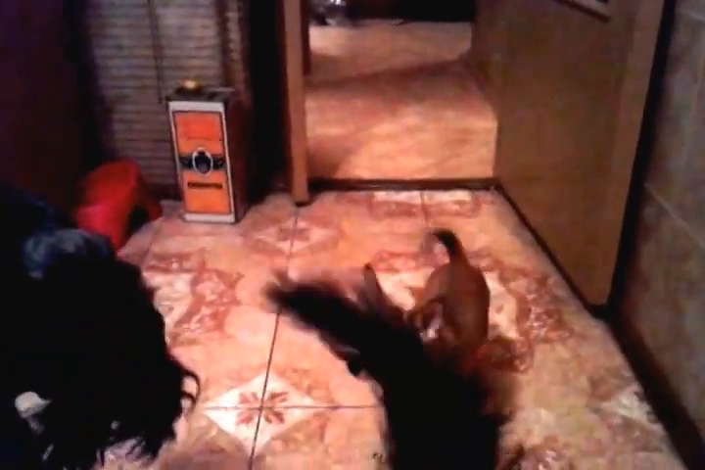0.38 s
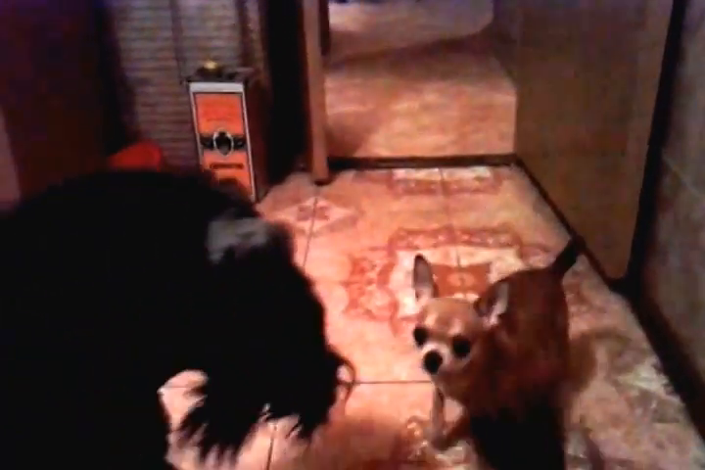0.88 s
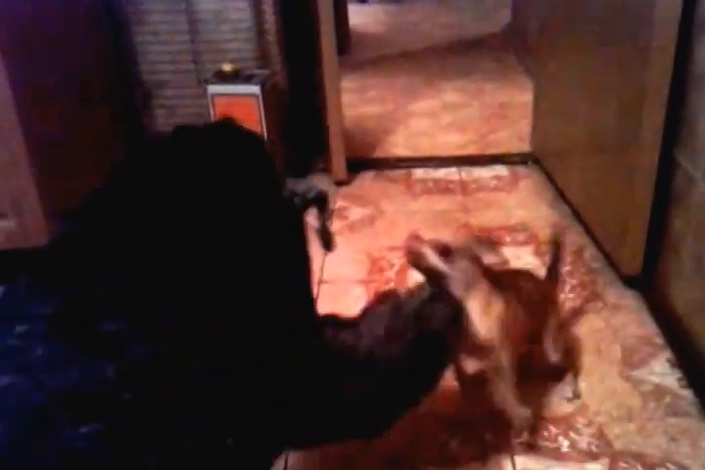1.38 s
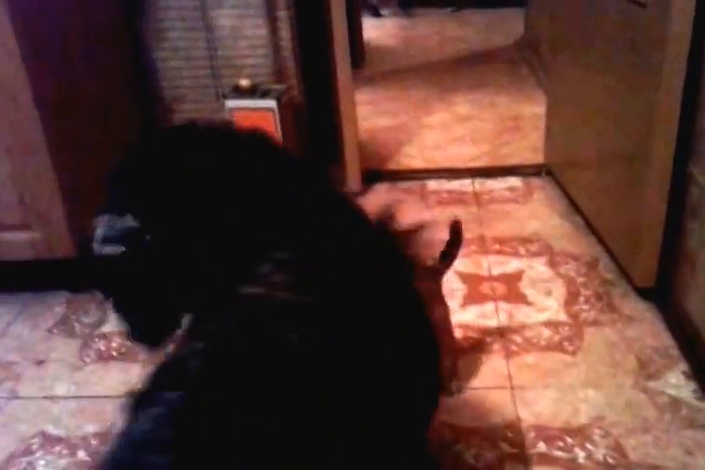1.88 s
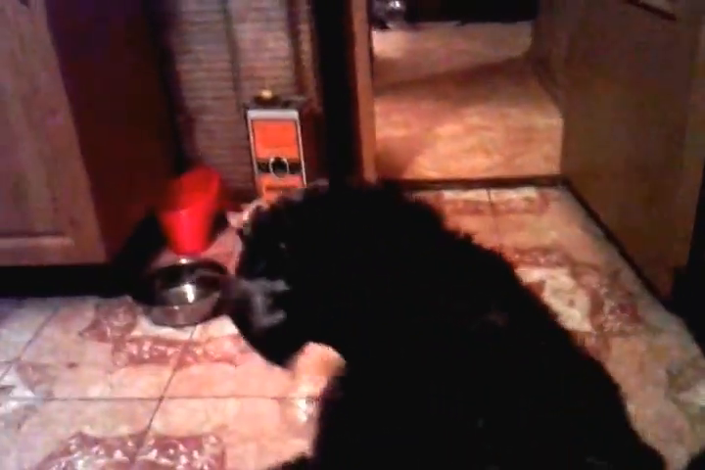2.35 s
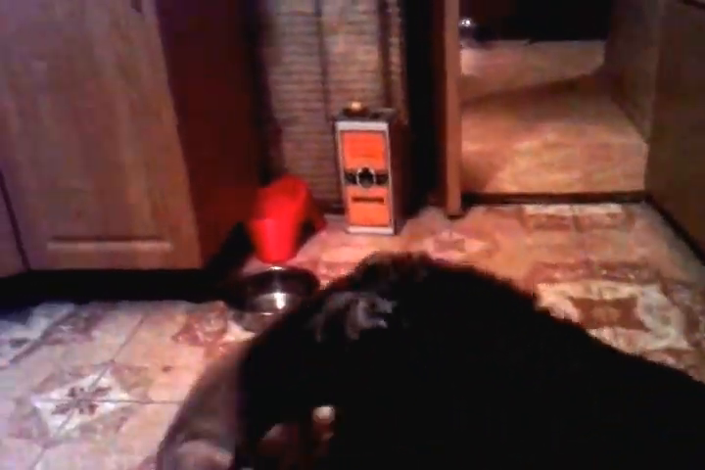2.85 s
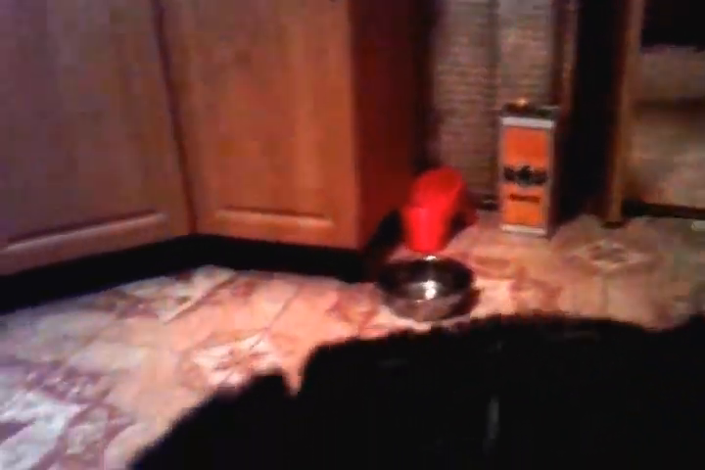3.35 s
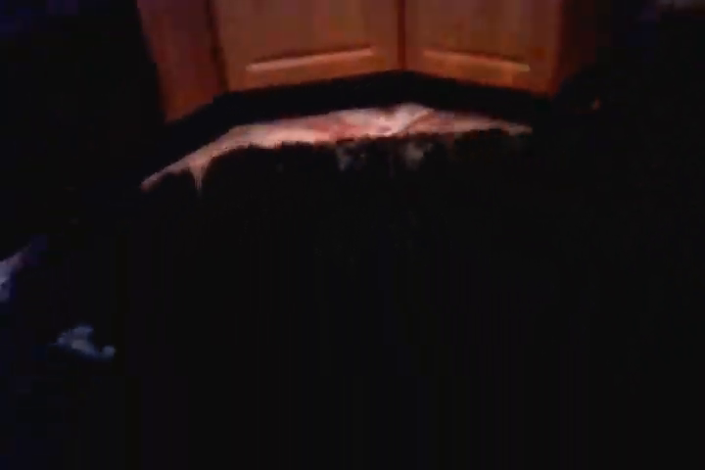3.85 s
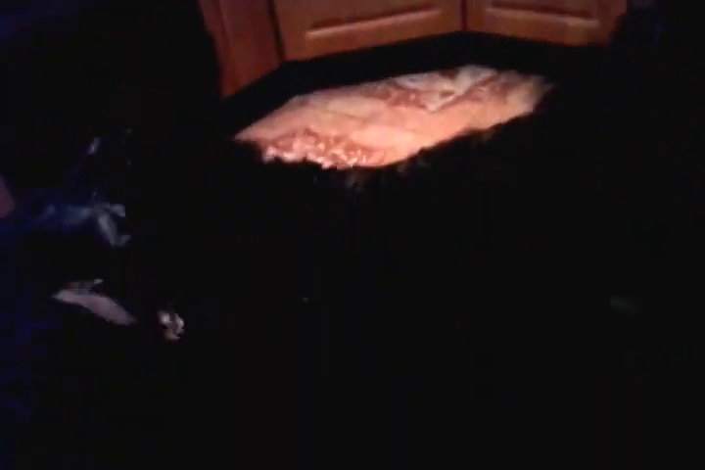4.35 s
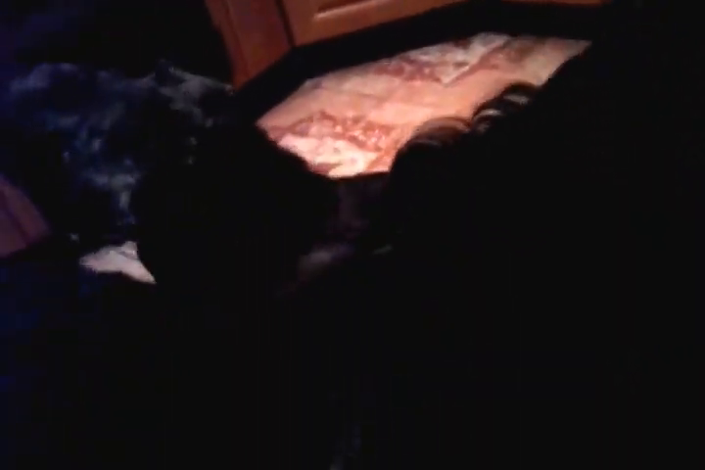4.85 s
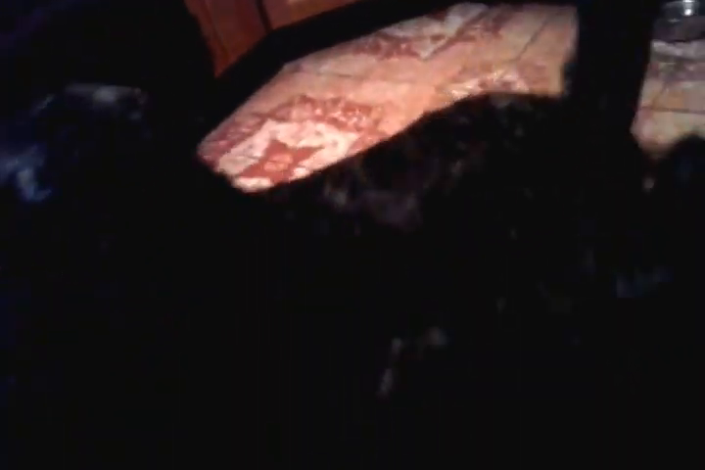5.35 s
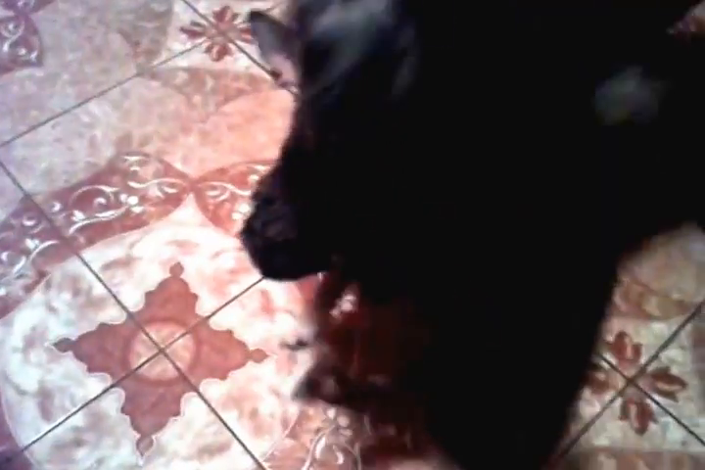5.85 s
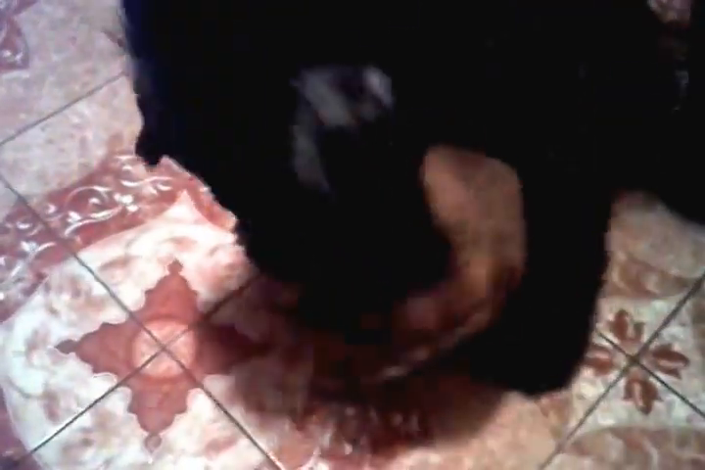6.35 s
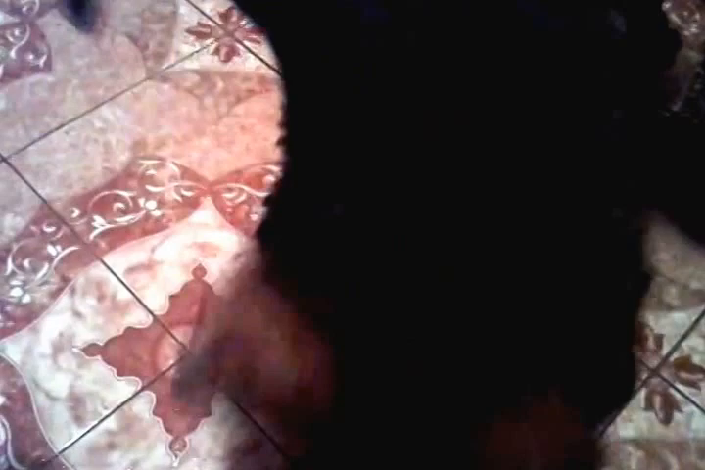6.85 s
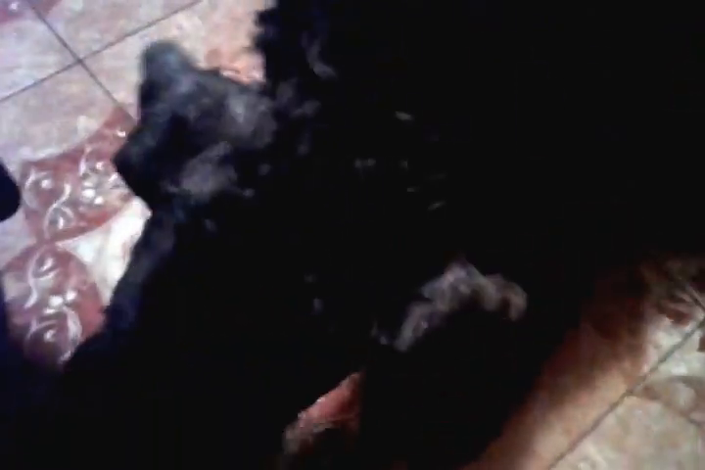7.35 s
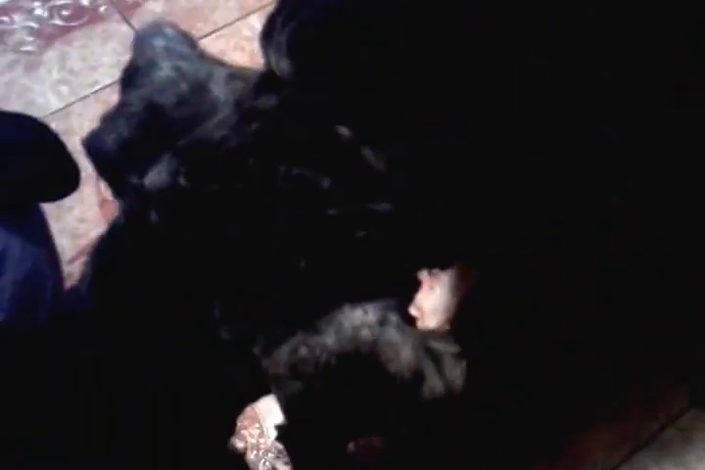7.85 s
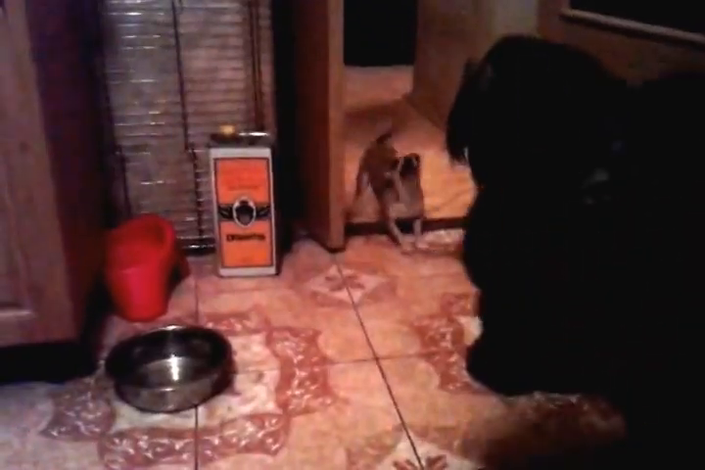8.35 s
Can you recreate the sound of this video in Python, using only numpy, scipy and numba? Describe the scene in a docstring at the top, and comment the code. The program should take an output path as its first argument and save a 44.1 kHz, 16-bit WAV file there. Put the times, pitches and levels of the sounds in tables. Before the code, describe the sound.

A big shaggy dog and a tiny one wrestle on kitchen tiles close to a small, cheap microphone. Bright claw ticks and airy fur scuffs come first, with paw knocks, a faint grunt and a short whine midway. Then heavy low bumps and handling-like thuds take over, muffled, before two loud hoarse yelps overload the microphone and ring in the hard room.

```python
"""Fur and pads scuff, claws tick, bodies bump, a collar tag tinkles, and there are grunts and a whine, as a big
shaggy dog and a tiny one wrestle on kitchen tiles by a small camera, over a fridge hum and a thin tone.
At the end the tiny dog yelps twice from the doorway; the hard room rings and the microphone overloads.
Rubbing is shaped noise, blows and the tag are fading rings, and voices are stacks of wavering harmonics."""
import sys
import numpy as np
from scipy import signal
from scipy.fft import rfft, irfft, next_fast_len
from scipy.io import wavfile
from scipy.ndimage import uniform_filter1d
from numba import njit

SR = 44100
rng = np.random.default_rng(int(sys.argv[2]) if len(sys.argv) > 2 else 0)


def gain_from_db(level_db):
    """Convert decibel levels to linear amplitude factors (20 dB per decade)."""
    decades = np.asarray(level_db, float) / 20
    return 10 ** decades


def store_wav(level_fs):
    """Save 16-bit WAV to argv[1]."""
    pcm = np.round(np.clip(np.atleast_2d(level_fs), -1, 1) * 32767)
    wavfile.write(sys.argv[1], SR, pcm.T.astype(np.int16))


N = 384552
T = np.arange(N) / SR  # time of every sample in seconds

# All levels below are those before the room, the gain control and the overload.
# Hum of the fridge. Each row: pitch in Hz, level in dB around which it wavers.
HUM = [(98, -68), (275, -74), (700, -76)]
# Colour of the air and microphone hiss. Each row: frequency in Hz, relative level in dB.
HISS_COLOUR = [(30, -23), (80, -18.5), (150, -16), (260, -29), (520, 8), (900, -6), (3000, -40),
               (6000, -18), (8000, -15), (11000, -6), (16000, -30)]
HISS_DB = -72  # level before its slow flicker

# Colours of fur swishing, pads sliding and bodies rubbing. Each row: frequency in Hz, relative level in dB.
SWISH_COLOUR = [(2060, -52), (3500, -19.5), (5900, -11.5), (6490, -8.5), (7230, -1.5), (7750, 2.5),
                (9740, -12), (11300, -15), (15100, -25.5), (16000, -36.5)]
SLIDE_COLOUR = [(500, -3), (1000, 3.5), (2000, 6), (3500, 2.5), (6000, -3), (12000, -18.5)]
RUB_COLOUR = [(30, -46.5), (70, -1), (110, 7), (175, -2), (280, 5.5), (600, -4.5), (1300, -13),
              (3000, -36.5)]
# Restless shifting between the scuffs. Each row: time in seconds, fur swish, pad slide and body rub in dB.
SHIFTING = [(0, -50, -82, -64.5), (.4, -58, -63, -64), (.64, -49.5, -60, -64.5), (1.0, -51.5, -63.5, -65),
            (1.33, -67, -70, -71.5), (1.56, -61, -70.5, -70), (1.85, -51, -62.5, -70),
            (2.9, -54, -65, -67.5), (3.6, -48, -61.5, -62), (3.85, -56, -62, -72), (4.33, -55, -64, -61.5),
            (4.9, -46, -59.5, -60), (5.18, -61, -60.5, -62.5), (5.52, -65, -62, -73),
            (5.7, -52.5, -59, -59), (6.0, -66, -59, -41.5), (6.15, -89, -80, -52), (6.3, -95.5, -73, -59.5),
            (7.37, -87, -75, -60), (7.97, -98, -63, -48.5), (8.001, -53, -54.5, -48),
            (8.08, -47, -49.5, -49), (8.72, -48.5, -47.5, -46.5)]
# Fur and pads scuffing the tiles. Each row: peak time, rise and fall in seconds, fur swish and pad slide in dB.
SCUFFS = [(0.01, 0.13, 0.4, -41, -53), (.2, 0.026, 0.049, -42.5, -73), (.324, 0.022, 0.048, -45.5, -68),
          (.402, 0.083, 0.067, -50, -69), (.49, 0.093, .035, -47, -64), (.586, .06, .05, -53, -70),
          (1.055, 0.14, 0.06, -49, -52), (1.13, 0.18, 0.083, -44.5, -60), (1.23, 0.14, 0.17, -52.5, -72),
          (1.395, 0.048, 0.15, -35, -58), (1.62, 0.036, 0.06, -41.5, -62),
          (1.685, 0.046, 0.14, -35.5, -51.5), (1.79, 0.038, 0.25, -41.5, -62),
          (1.96, 0.026, 0.094, -39.5, -64), (2.075, 0.14, 0.23, -35.5, -47), (2.33, 0.16, 0.15, -43.5, -41),
          (2.48, 0.22, 0.24, -40.5, -63), (2.63, 0.12, 0.3, -32, -46), (2.81, 0.02, 0.12, -38.5, -70),
          (2.85, .02, 0.13, -39, -64), (2.94, 0.019, 0.13, -40.5, -63), (3.04, 0.12, 0.19, -42, -72),
          (3.15, 0.4, 0.25, -35.5, -51), (3.316, 0.19, 0.15, -32.5, -46.5),
          (3.425, 0.053, 0.16, -40.5, -54.5), (3.53, 0.31, 0.19, -41, -58), (3.746, 0.1, 0.17, -43.5, -60),
          (4.04, .02, 0.09, -42.5, -57), (4.19, 0.15, 0.15, -38.5, -54.5),
          (4.355, 0.026, 0.044, -40.5, -61), (4.405, 0.012, 0.25, -41.5, -69),
          (4.53, .015, 0.062, -42.5, -61), (4.655, 0.12, 0.24, -28.5, -40.5),
          (4.84, 0.19, 0.19, -45.5, -52), (4.895, 0.022, 0.16, -43.5, -66), (4.995, 0.021, 0.087, -43, -55),
          (5.08, 0.065, 0.073, -39.5, -53), (5.228, 0.044, 0.19, -34, -49.5),
          (5.285, 0.095, 0.24, -26.5, -42), (5.43, 0.6, 0.052, -48, -48.5), (5.56, 0.034, 0.33, -54.5, -69),
          (5.7, 0.019, 0.065, -42, -58.5), (5.752, 0.1, 0.16, -47, -54.5), (5.94, 0.41, 0.045, -67, -51.5),
          (6.12, .03, 0.013, -73, -54), (6.45, 0.45, 0.52, -70.5, -70), (6.68, 0.018, 0.29, -79, -64.5),
          (7.07, 0.045, 0.56, -74, -74.5), (7.385, 0.019, 0.033, -59, -61), (7.43, 0.097, 0.05, -85, -53.5),
          (7.56, 0.031, 0.095, -76, -50), (7.69, 0.17, 0.19, -72, -35), (7.915, 0.07, 0.061, -70, -46.5)]
# Heavy bodies rubbing the floor. Each row: peak time, rise and fall in seconds, level in dB.
RUBS = [(.324, 0.055, .04, -57), (1.42, 0.06, 0.25, -64), (1.785, 0.12, 0.1, -49.5),
        (2.326, 0.43, 0.16, -57.5), (2.67, 0.12, 0.11, -59), (3.31, 0.43, 0.04, -53),
        (3.68, 0.25, 0.36, -53), (3.9, 0.057, 0.7, -49.5), (4.03, 0.042, 0.26, -51), (4.64, 0.1, 0.18, -57),
        (5.302, 0.071, 0.31, -49.5), (5.436, 0.015, 0.15, -55), (5.56, 0.044, 0.53, -46.5),
        (5.755, 0.082, 0.51, -43), (6.145, 0.075, 0.0074, -32.5), (6.17, 0.04, 0.21, -42.5),
        (6.37, .02, 0.62, -47), (6.488, 0.22, 0.2, -42), (6.718, 0.11, 0.14, -46.5),
        (7.07, 0.025, 0.74, -54.5), (7.39, 0.011, 0.21, -37), (7.574, 0.041, 0.0079, -28),
        (7.7, 0.89, 0.34, -39.5)]
STROKE_DROP_DB, STROKE_ROUND = 31.5, 1.323  # fall over one rise or fall time; roundness of the top
SLIDE_LAG_S = 0.012  # the pads slip a little after the fur
STRAY_TICKS_PER_S, STRAY_TICK_DB = 6, 1  # faint ticks; their strength over the fur swish, before colouring

# Paws and elbows knocking the tiles. Each row: start in seconds, level in dB, ring in Hz.
KNOCKS = [(0.095, -41, 880), (0.319, -48, 676), (0.577, -48.5, 717), (1.052, -40, 826),
          (1.425, -54.5, 1080), (1.719, -42, 920), (1.769, -39.5, 835), (1.79, -38, 1006),
          (3.421, -48, 1170), (3.901, -41.5, 782), (4.179, -40.5, 966), (4.892, -45, 570),
          (5.724, -39, 697), (5.753, -38.5, 1235), (5.864, -35.5, 740), (6.004, -35, 595),
          (6.355, -41, 658), (6.478, -38.5, 575), (6.677, -47, 1890), (6.722, -53, 570), (7.442, -34, 620),
          (7.799, -38.5, 880), (7.445, -38, 1520)]
# Claw ticks. Each row: start in seconds, level in dB, dull part relative to that in dB.
CLAWS = [(0.191, -35, -37), (0.2659, -24.5, -27), (0.321, -24.5, -21), (0.4003, -25, -22),
         (0.447, -27.5, -43), (0.493, -22, -42), (0.534, -24, -35), (0.5568, -27, -9), (0.582, -17, -49),
         (0.627, -21.5, -36), (0.6849, -23.5, -20), (0.746, -35.5, -17), (0.758, -30, -15),
         (0.832, -34, -30), (1.3807, -24, -26), (1.6772, -23.5, -24), (1.7848, -33, -23),
         (1.951, -35.5, -22), (2.305, -38.5, -17), (2.583, -22.5, -35), (2.803, -37, -27),
         (2.8446, -27.5, -19), (2.9342, -30.5, -30), (3.4136, -30, -23), (4.0313, -28.5, -39),
         (4.3488, -32.5, -21), (4.401, -27, -20), (4.525, -33, -17), (4.8384, -30, -16),
         (4.8904, -32.5, -1.5), (4.9937, -33.5, -11), (5.075, -36, -14), (5.2227, -23, -33),
         (5.4376, -21, -22), (5.695, -37.5, -31), (7.3944, -54, 18), (7.5704, -45, 13), (7.925, -54, -1.5),
         (7.9987, -36, -18)]
# Colour of a claw tick. Each row: frequency in Hz, relative level in dB.
TICK_COLOUR = [(3000, -39), (6000, -20), (7300, 1), (8000, 10.5), (9500, -11), (13000, -31), (16000, -36.5)]
# Blows on the collar tag. Each row: start in seconds, level in dB.
TAG_HITS = [(.482, -40), (4.798, -40.5), (4.837, -43), (5.433, -40.5), (5.788, -58), (5.859, -53.5),
            (8.63, -43.5)]
# Rings of the tag. Each row: pitch in Hz, relative level in dB, time to fade by 60 dB in seconds.
TAG_RINGS = [(10030, 7.5, 0.058), (11070, 0, 0.1), (11860, -6, 0.24), (15470, -11.5, .2)]
# Bodies bumping floor and camera. Each row: start in seconds, level in dB, ring in Hz.
BUMPS = [(1.42, -56, 210), (4.029, -48, 383), (6.72, -38, 270), (5.432, -30, 97.5), (6.003, -19, 242),
         (6.086, -17.5, 95), (6.149, -20.5, 118), (7.058, -35, 277), (7.146, -37.5, 250), (7.389, -25, 286),
         (7.416, -11, 81), (7.478, -25, 208), (7.564, -35, 205), (7.6235, -20, 350), (7.72, -32, 258),
         (7.797, -28, 240)]

# Grunts. Each row: start and length in seconds, first and last pitch in Hz, level in dB.
GRUNTS = [(3.56, 0.28, 81, 101.7, -50), (6.352, 0.293, 120.6, 147.3, -50.5)]
# Resonances of the big chest. Each row: centre in Hz, width in Hz, relative level in dB.
CHEST = [(150, 160, 7), (280, 110, -3), (620, 260, -4)]
# The whine. One row: start and length in seconds, first and last pitch in Hz, level in dB.
WHINE = (3.855, .285, 322, 474, -40)
# Snaps of the camera casing. Each row: start in seconds, peak in dB.
SNAPS = [(4.031, -22), (5.437, -19), (5.942, -23), (5.977, -27), (6.0226, -26), (6.1366, -20),
         (6.35, -34.5), (6.44, -32), (7.566, -30), (7.5705, -26), (7.571, -25), (7.62, -29), (7.8006, -23),
         (7.913, -28), (7.928, -36)]
# When the thin tone sounds. Each row: start and end in seconds, level in dB around which it wavers.
THIN_TONE = [(5.53, 6.0, -66), (7.78, 7.997, -65)]
THIN_TONE_HZ = 2400  # pitch around which it wavers

# Two yelps, each splitting into two pitches at once. Each row: start and length in seconds, first and top
# pitch in Hz, level in dB, fade in dB per second, pitch jitter as a share of the pitch once hoarse.
YELPS = [(8.103, 0.11, 1130, 1687, 1.5, 36, 0.026), (8.154, 0.075, 1835, 1849, 1, 20, 0.013),
         (8.321, 0.1303, 800, 979.5, 0.5, 30, 0.035), (8.344, 0.17, 1090, 1459, -1, 91, 0.042)]
YELP_GLIDE_S, YELP_SAG_HZ_PER_S, YELP_SWELL_DB = .059, 15, 3.5
# Tone colour of the first yelp's lower pitch. Each row: frequency in Hz, gain in dB.
FIRST_LOWER_TONE = [(500, -16), (1000, 13), (1300, -11.5), (1800, 9), (2300, -1), (2700, 3.5), (3500, -0.5),
                    (4400, -4), (5200, -7.5), (8000, -8.5), (12000, -31)]
# Tone colour of the first yelp's upper pitch and of the second yelp. Each row: frequency in Hz, gain in dB.
OTHER_YELP_TONE = [(500, -20), (850, -3.5), (1000, -16), (1450, 1), (1950, 4), (2300, 5), (2650, 2.5),
                   (2950, 3), (3900, -8), (4600, -16.5), (5800, -11), (8000, -18), (12000, -41)]
# Hoarse air in a yelp. Each row: frequency in Hz, relative level in dB.
RASP_COLOUR = [(900, -21), (1300, -4), (1800, 3.5), (3000, 5.5), (4400, -2), (8000, -6.5), (12000, -21.5)]
# Low thumps of the overloaded microphone input at the height of each yelp.
# Each row: peak time, rise and fall in seconds, level in dB.
THUMPS = [(8.172, 0.052, 0.0085, -9.5), (8.205, 0.046, .015, -21), (8.383, 0.015, 0.013, -16),
          (8.408, 0.014, 0.032, -18)]
# Colour of those thumps. Each row: frequency in Hz, relative level in dB.
THUMP_COLOUR = [(50, -10), (120, 0), (350, 0), (800, -9), (1300, -30)]

ROOM_T60_S, ROOM_DAMP = 0.35, 0.32  # time to fade by 60 dB before damping; treble lost on every round
QUIET_DB, LOUD_DB = -33, -21  # the gain control acts below the first and above the second
TOP_HZ = 16000  # upper edge of the input stage


def coloured(points, x):
    """Shape the spectrum of x by points of Hz and dB, then bring its rms to 1."""
    hz, db = np.transpose(points)
    size = next_fast_len(N)
    f = np.arange(size // 2 + 1) * SR / size + 1
    gain = gain_from_db(np.interp(np.log(f), np.log(hz), db))
    y = irfft(rfft(x, size) * gain, size)[:N]
    return y / np.sqrt(np.mean(y ** 2))


def ring(x, hz, t60):
    """One fading resonance, struck by x; an impulse of 1 rings with peak 1."""
    r = np.exp(-np.log(1000) / (max(t60, .001) * SR))
    w = 2 * np.pi * hz / SR
    return signal.lfilter([0, r * np.sin(w)], [1, -2 * r * np.cos(w), r * r], x)


def walk(rate):
    """Random levels, rate of them per second, joined smoothly; spread near 1."""
    k = int(SR / rate)
    steps = np.repeat(rng.standard_normal(N // k + 1), k)
    return 1.37 * uniform_filter1d(uniform_filter1d(steps, k), k)[:N]


def add(out, s, x):
    """Mix x into out from time s."""
    i = int(s * SR)
    out[i:i + len(x)] += x[:N - i]


def friction(colour, db, grain_db, flicker_db, flicker_hz):
    """Countless tiny slips, a few much bigger than the rest, in uneven waves."""
    sizes = gain_from_db(grain_db * np.minimum(rng.exponential(size=N), 7))
    slips = rng.standard_normal(N) * sizes
    return coloured(colour, slips) * gain_from_db(db + flicker_db * walk(flicker_hz))


def strokes(table, column, between_db, lag_s=0):
    """Level in dB of strokes that swell to a peak and die away, over the shifting between them."""
    t = T[::64] - lag_s
    power = gain_from_db(2 * between_db[::64])
    for row in table:
        away = np.abs(t - row[0]) / np.where(t < row[0], row[1], row[2])
        power = power + gain_from_db(2 * (row[column] - STROKE_DROP_DB * away ** STROKE_ROUND))
    return np.interp(T, T[::64], 10 * np.log10(power))


def blows(table, t60, cycles, rattle_db):
    """A soft push sets a dull ring going and leaves a short rattle around it."""
    out, t = np.zeros(N), T[:SR // 4]
    noises = rng.standard_normal((len(table), len(t)))
    for (s, db, hz), noise in zip(table, noises):
        swell = 1 - np.exp(-t * hz / 0.5)
        rattle = ring(noise, 1.017 * hz, 6.5 / hz)
        body = np.sin(2 * np.pi * hz * t) + gain_from_db(rattle_db) * rattle / np.std(rattle)
        fade = gain_from_db(-60 * t / min(t60, cycles / hz))
        add(out, s, gain_from_db(db) * swell * body * fade)
    return out


def call(row, glide_s, attack_s, release_s, fade_db_per_s, sag_hz_per_s=0, swell_db=0):
    """Attack, swell through the glide, fade and sag, release: rows of seconds, Hz and dB."""
    start, length, first_hz, last_hz, db = row
    glide_s = min(glide_s, length - release_s)
    t = np.array([0, attack_s, glide_s, length - release_s, length])
    late = np.maximum(t - glide_s, 0)
    hz = first_hz + (last_hz - first_hz) * np.minimum(t / glide_s, 1) - sag_hz_per_s * late
    below_db = np.array([30, swell_db, 0, 0, 45])
    return np.transpose([start + t, hz, db - fade_db_per_s * late - below_db])


def played(rows):
    """Pitch and gain of a call at every sample, practically silent outside it."""
    s, hz, db = np.transpose(rows)
    return np.interp(T, s, hz), gain_from_db(np.interp(T, s, db, left=-200, right=-200))


def voice(rows, tract, air, count, jitter, shimmer_db, breath_db):
    """Harmonics of wavering vocal folds, shaped by the tract, each flickering; clear at first, then hoarse."""
    hz, gain = played(rows)
    hoarse = np.clip((T - rows[0][0]) / .05, .25, 1)
    hz = hz * (1 + hoarse * jitter * walk(300))
    on = gain > 1e-6
    turn = 2 * np.pi * np.cumsum(hz[on]) / SR
    f, db = np.transpose(tract)
    out = np.zeros(N)
    for k in range(1, count + 1):
        tract_db = np.interp(np.log(k * hz[on]), np.log(f), db)
        flicker_db = (hoarse * shimmer_db * walk(150))[on]
        out[on] += gain_from_db(tract_db + flicker_db) * np.sin(k * turn)
    breath = gain_from_db(breath_db) * coloured(air, rng.standard_normal(N))
    return gain * (out + hoarse * breath) * gain_from_db(hoarse * shimmer_db * walk(120) / 2)


def kitchen():
    """Air and microphone hiss under a fridge hum whose tones waver in pitch and level."""
    hum = np.zeros(N)
    for hz, db in HUM:
        turn = 2 * np.pi * np.cumsum(hz * (1 + .012 * walk(40))) / SR
        hum += gain_from_db(db + 4.2 * walk(12)) * np.sin(turn)
    return hum + friction(HISS_COLOUR, HISS_DB, grain_db=0, flicker_db=0.56, flicker_hz=8.7)


def scuffle():
    """Fur swishes, pads slide, heavy bodies rub along the floor; stray claws tick while they move."""
    s, *columns = np.transpose(SHIFTING)
    swish_db, slide_db, rub_db = (np.interp(T, s, c) for c in columns)
    swish_db = strokes(SCUFFS, column=3, between_db=swish_db)
    slide_db = strokes(SCUFFS, column=4, between_db=slide_db, lag_s=SLIDE_LAG_S)
    rub_db = strokes(RUBS, column=3, between_db=rub_db)
    swish = friction(SWISH_COLOUR, swish_db, grain_db=2.5, flicker_db=1.18, flicker_hz=70)
    slide = friction(SLIDE_COLOUR, slide_db, grain_db=2.5, flicker_db=1.6, flicker_hz=60)
    rub = friction(RUB_COLOUR, rub_db, grain_db=2.2, flicker_db=1.6, flicker_hz=50)
    happens = rng.random(N) < STRAY_TICKS_PER_S / SR
    stray = happens * rng.standard_normal(N) * gain_from_db(swish_db + STRAY_TICK_DB)
    return swish + slide + rub + np.std(stray) * coloured(TICK_COLOUR, stray)


def knocks():
    """Paws and elbows strike the hard tiles, which ring for a moment."""
    return blows(KNOCKS, t60=0.083, cycles=82, rattle_db=-0.71)


def claws():
    """Each tick is a brief scrape on the glaze, with a bright part and a dull ring."""
    bright, dull, t = np.zeros(N), np.zeros(N), T[:SR // 50]
    scrapes = rng.standard_normal((len(CLAWS), len(t))) * np.exp(-t / 0.00077)
    scrapes = scrapes / np.abs(scrapes).max(axis=1, keepdims=True)
    # How hard each scrape would ring the glaze; dividing by it evens out chance differences.
    glaze = np.abs(ring(scrapes, 7900, .003)).max(axis=1)
    for (s, db, dull_db), scrape, rings in zip(CLAWS, scrapes, glaze / np.median(glaze)):
        add(bright, s, gain_from_db(db) * scrape / rings)
        add(dull, s, gain_from_db(db + dull_db) * scrape)
    bright = np.std(bright) * coloured(TICK_COLOUR, bright)
    return gain_from_db(5.5) * bright + gain_from_db(4.0) * ring(dull, 2250, 0.00087)


def tag():
    """A small metal tag: few, high, clean rings set off by each tap."""
    taps = np.zeros(N)
    for s, db in TAG_HITS:
        add(taps, s, gain_from_db([db]))
    top_db = max(db for _, db, _ in TAG_RINGS)
    return gain_from_db(6.5) * sum(gain_from_db(db - top_db) * ring(taps, hz, t60) for hz, db, t60 in TAG_RINGS)


def bumps():
    """Bodies bump the floor and the camera: low rings that die after a few cycles."""
    return blows(BUMPS, t60=0.055, cycles=8.9, rattle_db=-1.5)


def grunts():
    """Rough low voices whose harmonics are shaped by the resonances of the big chest."""
    f = np.geomspace(60, 1500, 40)
    chest = sum(gain_from_db(db) / np.hypot(1, 2 * (f - hz) / w) ** 2 for hz, w, db in CHEST)
    tract = np.transpose([f, 20 * np.log10(chest)])
    swelling = call(GRUNTS[0], glide_s=1, attack_s=0.14, release_s=0.13, fade_db_per_s=0)
    bursting = call(GRUNTS[1], glide_s=.07, attack_s=.008, release_s=.05, fade_db_per_s=10, sag_hz_per_s=240)
    return sum(voice(rows, tract, tract, count=9, jitter=.015, shimmer_db=2, breath_db=-20)
               for rows in (swelling, bursting))


def whine():
    """A closed-mouth whine, nearly a pure tone, as the nose lets only the low harmonics through."""
    nose = [(300, 4.5), (500, 0.0), (800, -23), (1500, -36)]  # Hz, dB
    rows = call(WHINE, glide_s=1, attack_s=0.06, release_s=0.051, fade_db_per_s=0, swell_db=-3.5)
    return voice(rows, nose, nose, count=3, jitter=0.011, shimmer_db=2.0, breath_db=-38)


def casing_snaps():
    """Snaps of the camera casing: each is one very short, sharp click."""
    out, t = np.zeros(N), T[:SR // 50]
    for s, db in SNAPS:
        add(out, s, gain_from_db(db) * np.cos(2 * np.pi * 1500 * t) * np.exp(-t / .00008))
    return out


def thin_tone():
    """A faint narrow whistle that switches on and off, wavering in pitch and level."""
    gate = sum(gain_from_db(db) * ((T > start) & (T < end)) for start, end, db in THIN_TONE)
    gate = uniform_filter1d(gate, SR // 100)
    turn = 2 * np.pi * np.cumsum(THIN_TONE_HZ * (1 + .012 * walk(100))) / SR
    return gate * np.sqrt(2) * gain_from_db(2.2 * walk(60)) * np.sin(turn)


def yelps():
    """Two wavering voices per yelp, each with its tone colour and wrapped in rasp."""
    out = np.zeros(N)
    tones = [FIRST_LOWER_TONE, OTHER_YELP_TONE, OTHER_YELP_TONE, OTHER_YELP_TONE]
    for (*row, fade_db_per_s, jitter), tone in zip(YELPS, tones):
        rows = call(row, YELP_GLIDE_S, 0.014, 0.0106, fade_db_per_s, YELP_SAG_HZ_PER_S, YELP_SWELL_DB)
        out = out + voice(rows, tone, RASP_COLOUR, count=7, jitter=jitter, shimmer_db=4.5, breath_db=-5)
    return out


def thumps():
    """Low thumps of the overloaded microphone input at the height of each yelp, made as short noise bursts."""
    db = strokes(THUMPS, column=3, between_db=np.full(N, -120.))
    return friction(THUMP_COLOUR, db, grain_db=0.93, flicker_db=4, flicker_hz=90)


@njit
def walls(x, lags, gain, damp):
    """Echoes of a hard room: eight delay lines that feed each other, duller on every round."""
    line, soft, out = np.zeros((8, 4096)), np.zeros(8), np.zeros(len(x))
    for i in range(len(x)):
        total = 0.
        for k in range(8):
            soft[k] += (1 - damp) * (gain[k] * line[k, (i - lags[k]) & 4095] - soft[k])
            total += soft[k]
            out[i] += soft[k] * (1 - 2 * (k % 2))
        for k in range(8):
            line[k, i & 4095] = x[i] + soft[k] - total / 4
    return out


def scene():
    """Near sounds are fairly dry; the yelps from the doorway fill the room."""
    hits = knocks() + claws() + tag() + grunts() + whine() + casing_snaps()
    cries = yelps()
    lags = np.array([331, 449, 563, 701, 857, 1019, 1193, 1381])  # samples
    sent = gain_from_db(-17.0) * hits + gain_from_db(-10.5) * cries + 1e-18
    room = walls(sent, lags, gain_from_db(-60 * lags / SR / ROOM_T60_S), ROOM_DAMP)
    mix = hits + cries + thumps() + room + bumps() + scuffle() + kitchen() + thin_tone()
    return mix[None]


def gain_control(x):
    """Quiet moments are pushed further down, loud ones held back."""
    db = 10 * np.log10(uniform_filter1d(x ** 2, SR // 40) + 1e-12)
    quiet_db = .3 * np.minimum(db - QUIET_DB, 0)
    loud_db = 0.53 * np.maximum(db - LOUD_DB, 0)
    return x * gain_from_db(quiet_db - loud_db)


def top_cut(x):
    """Nothing passes above the cut-off."""
    return signal.sosfilt(signal.butter(12, 16850, fs=SR, output="sos"), x)


def record(dry):
    """Gain control, then the input stage clips the yelps sooner one way than the other; both ends are cut."""
    held = gain_control(dry)
    rail = np.where(held > 0, .88, .95)
    clipped = held / (1 + (held / rail) ** 4) ** (1 / 4)
    low_cut = signal.butter(2, 65, "high", fs=SR, output="sos")
    high_cut = signal.ellip(8, .2, 70, TOP_HZ, fs=SR, output="sos")
    band = signal.sosfilt(high_cut, signal.sosfilt(low_cut, clipped))
    return top_cut(band)


dry = scene()
out = record(dry)
store_wav(out)
```